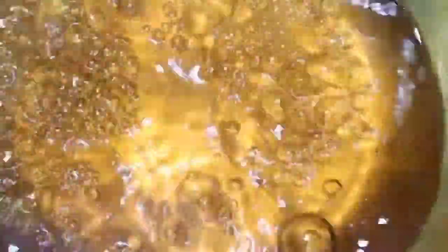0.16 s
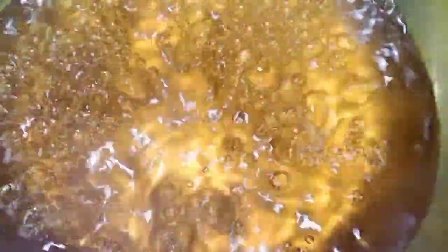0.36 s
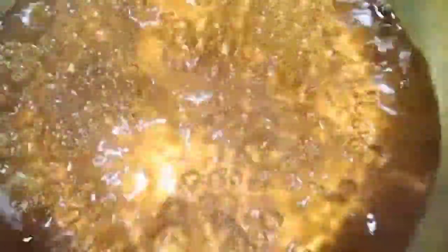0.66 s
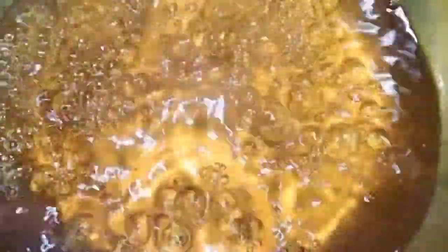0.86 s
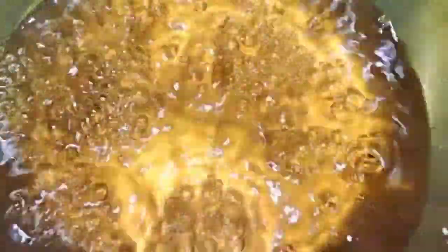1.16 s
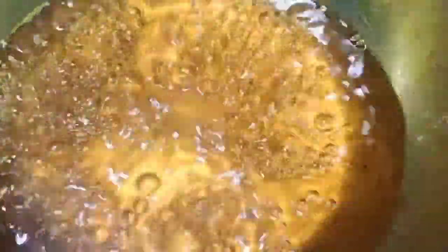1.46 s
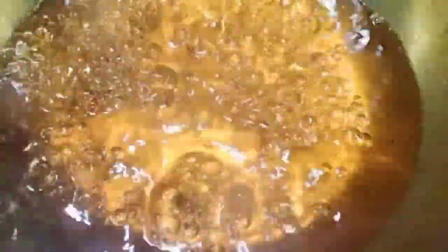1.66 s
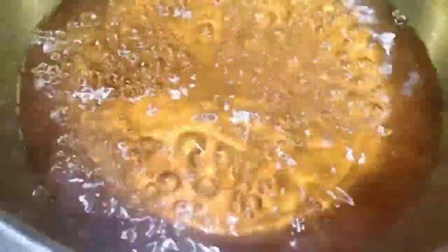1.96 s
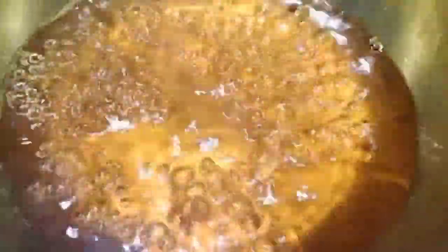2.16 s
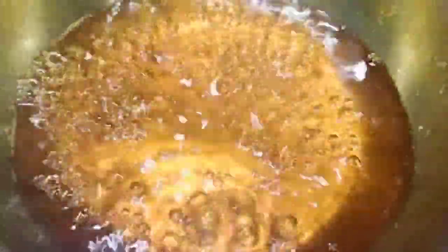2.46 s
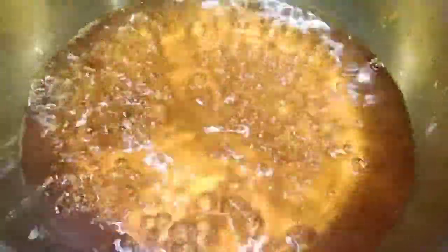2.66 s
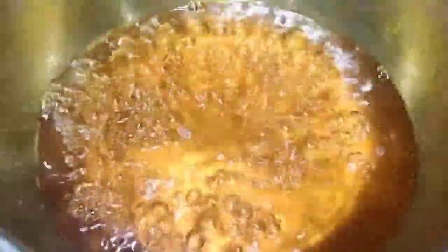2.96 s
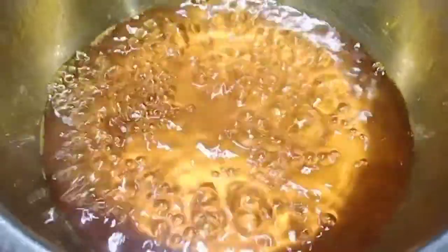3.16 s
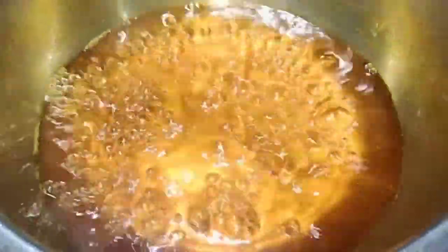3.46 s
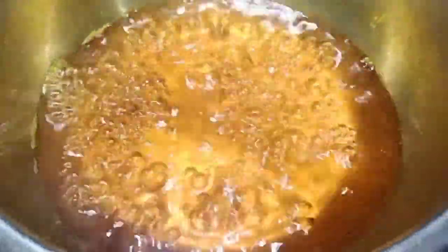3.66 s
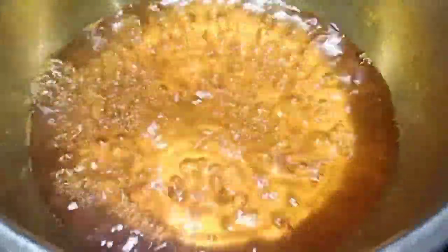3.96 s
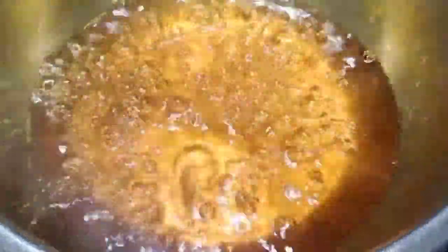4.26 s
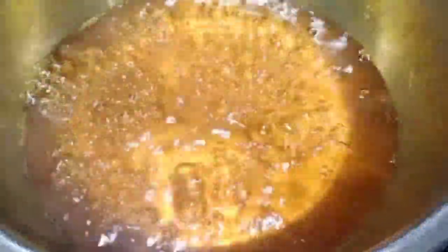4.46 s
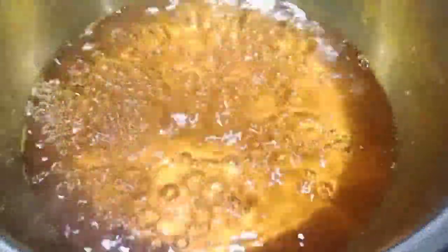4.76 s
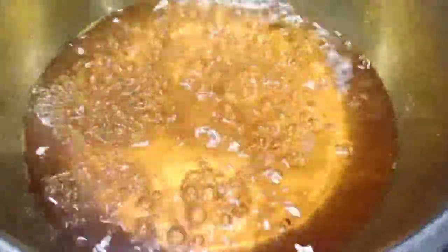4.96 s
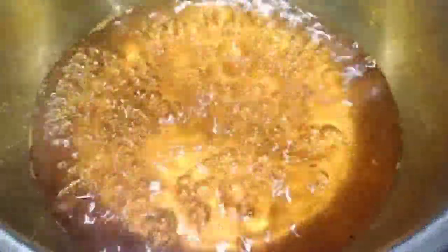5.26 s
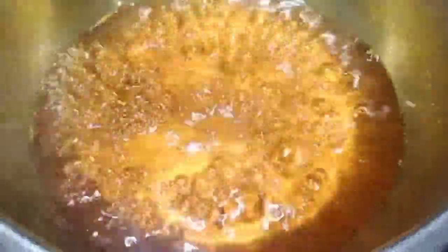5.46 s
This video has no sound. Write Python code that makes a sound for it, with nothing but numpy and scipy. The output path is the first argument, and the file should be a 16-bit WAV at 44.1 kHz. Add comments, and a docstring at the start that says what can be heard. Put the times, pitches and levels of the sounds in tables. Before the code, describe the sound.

From 0 s, thick syrup boils hard in a steel pan, close to a stereo microphone in a small kitchen. A dense fizz of tiny popping bubbles runs throughout, bright and hissy around 7-9 kHz, clearly stronger on the right, with brief irregular swells as foam collapses, notably near 3.5 and 3.85 s. Coarser bubbles tick in the middle range; larger ones burble wetly, hollowed by the pan. A low gurgling resonance colours roughly 0.1-2 s and then fades. Beneath are a soft gas-flame roar and a very faint low hum. Bubbling grows heavier around 4.5 s. At about 4.7-4.75 s a metal spatula strikes the pan: a rapid, bright, ringing clatter, strongest until 4.9 s, becoming a chattering scrape with tiny wavering squeaks to about 5.2 s. A weak scrape remnant and faint sizzle fade by 5.5 s, leaving the boil, slightly livelier, until the end.

```python
"""In a kitchen, sugar syrup boils hard in a steel pan over a gas flame, close to a two-port microphone.
Tiny bubbles are dense random clicks and short pings: a fizz, loudest on the right. Coarser ones tick,
larger ones burble through the pan's air resonances, and narrow bands of noise ring: a low gurgle, then faint
higher sizzle after the scrape. The flame is filtered noise, a hum a sine. Near the end a metal spatula knocks,
scrapes and squeaks on the pan: noise and clicks ring the modes of steel and blade; noise tails are the room."""
import sys
import numpy as np
from scipy import signal
from scipy.fft import rfft, irfft, next_fast_len
from scipy.io import wavfile

SR = 44100
rng = np.random.default_rng(int(sys.argv[2]) if len(sys.argv) > 2 else 0)


def dump(signal):
    """Clip the signal to [-1, 1] and save it as 16-bit WAV at the path in sys.argv[1]."""
    limited = np.clip(np.atleast_2d(signal).T, -1, 1)
    pcm = np.round(limited * 32767).astype(np.int16)
    wavfile.write(sys.argv[1], SR, pcm)


N = 246959
TIME = np.arange(N) / SR
BINS = np.fft.rfftfreq(8192, 1 / SR)

# wall modes of the steel pan: pitch [Hz]
STEEL_MODES_HZ = [1115, 1700, 2841, 3350, 3625, 3990, 4519, 5236, 5763, 5880, 6215, 7100, 7810, 8330, 9118,
                  9520, 9665, 10185, 11000, 12200, 13130, 14100]


def amp(db):
    """Decibels to gain."""
    return 10 ** (np.asarray(db) / 20)


def unit(x):
    """Scales to rms 1."""
    return x / np.sqrt(np.mean(x ** 2) + 1e-20)


def follow(rows):
    """Each column of a curve table, sample by sample."""
    s, *columns = np.transpose(rows)
    return [np.interp(TIME, s, c) for c in columns]


def shape(rows, modes=()):
    """Gain over frequency for each level column: a smooth spectrum plus resonance peaks."""
    hz, *columns = np.transpose(rows)
    levels_db = [np.interp(np.log(BINS + 1), np.log(hz), c) for c in columns]
    power = amp(levels_db) ** 2
    for centre, width, *ears in modes:
        peak = 1 / (1 + ((BINS - centre) / width) ** 2) ** 2
        power = power + amp(ears)[:, None] ** 2 * peak
    return np.sqrt(power)


def ring(x, gain):
    """Passes x through the causal minimum-phase filter of this gain, so that clicks ring and die."""
    log_gain = np.log(np.maximum(gain, 1e-6))
    circle = np.concatenate([log_gain, log_gain[:, -2:0:-1]], axis=1)
    response = np.fft.ifft(np.exp(np.conj(signal.hilbert(circle)))).real
    return signal.oaconvolve(np.atleast_2d(x), response[:, :len(BINS)], axes=1)[:, :N]


def below(x, hz):
    """The part of x under this frequency."""
    return signal.sosfiltfilt(signal.butter(2, hz, fs=SR, output="sos"), x)


def tilted(x, tilt_db, pivot_hz):
    """Raises the treble and lowers the bass by tilt_db, around a pivot."""
    dull = below(x, pivot_hz)
    return dull * amp(-tilt_db) + (x - dull) * amp(tilt_db)


def envelope(start, length, rise_s, release_s, sag_db_per_s=0):
    """A straight rise, a steady sag in dB from the start, and an exponential release after length."""
    age = np.maximum(TIME - start, 0)
    release = np.exp(-np.maximum(age - length, 0) / release_s)
    return np.minimum(age / rise_s, 1) * amp(-sag_db_per_s * age) * release


def wander(low_hz, high_hz):
    """Slow noise of rms 1, with about equal weight in each octave between two rates."""
    size = next_fast_len(N, True)
    hz = np.fft.rfftfreq(size, 1 / SR)
    spectrum = rfft(rng.standard_normal(size))
    spectrum = spectrum / np.sqrt((hz + low_hz) * (1 + (hz / high_hz) ** 4))
    spectrum = spectrum * hz / (hz + low_hz)
    return unit(irfft(spectrum, size)[:N])


def clicks(per_s, spread_db):
    """Random clicks of rms 1 and either sign, their levels in dB spread exponentially."""
    size = amp(spread_db * np.minimum(rng.exponential(1, N), 5))
    sign = rng.choice([-1, 1], N)
    return unit(size * sign * (rng.random(N) < per_s / SR))


def bubbles(low_hz, high_hz, cycles, spread_db, climb, count, size):
    """Bubbles at random times, each a sine decaying over some cycles at its own slightly climbing pitch."""
    when, pitch, strength = rng.random((count, 3)).T[:, :, None]
    turns = low_hz * (high_hz / low_hz) ** pitch * np.arange(size) / SR
    age = turns / cycles
    height = amp(spread_db * np.minimum(-np.log(1 - strength), 4))
    rings = height * np.exp(-age) * np.sin(2 * np.pi * turns * (1 + climb * age))
    at = (when * N).astype(int) + np.arange(size)
    return unit(np.bincount(at.ravel(), rings.ravel(), N)[:N])


def at_ports(x):
    """Sound from the pan reaches the left port a little before the right."""
    lag_s = .00012
    return np.array([x, np.interp(TIME - lag_s, TIME, x)])


def near_echoes(x):
    """Early reflections off the pan's own wall ripple the spectrum."""
    # (delay [s], gain)
    reflections = [(.0031, .17), (.0053, -.2), (.0082, .18), (.0127, .15)]
    return x + sum(gain * np.pad(x, (round(s * SR), 0))[:N] for s, gain in reflections)


def kitchen(x):
    """Diffuse reflections: noise tails, different at each port, with a decay time set by frequency."""
    # (frequency [Hz], time to fall 60 dB [s])
    decay = [(300, 0.14), (1600, 0.2), (4000, 0.52), (9000, 0.29), (14000, 0.39)]
    hz, t, z = signal.stft(rng.standard_normal((2, SR // 2)), SR, nperseg=256)
    t60 = np.interp(hz, *np.transpose(decay))[:, None]
    build_up = 1 - np.exp(-t / .006)
    tail = signal.istft(z * amp(-60 * t / t60) * build_up, SR, nperseg=256)[1]
    return signal.oaconvolve(x * np.ones((2, 1)), tail / np.linalg.norm(tail[0]), axes=1)[:, :N]


def scattered(x, count=4, spots_per_s=45):
    """Bubbles rise now here, now there: x moves between spots, each with its own reflections."""
    spot = spots_per_s * TIME + wander(3.9, 12.3)
    total = 0
    for k in range(count):
        share = np.maximum(1 - abs((spot - k) % count - 1), 0)
        total = total + kitchen(x * np.sqrt(share))
    return total


def hum(pitch_hz=120):
    """An appliance's faint mains hum: a sine of changing level."""
    # (time [s], level [dB])
    course = [(0, -68.5), (.7, -61.5), (1.3, -86), (5.6, -71)]
    return amp(follow(course)[0]) * unit(np.sin(2 * np.pi * pitch_hz * TIME))


def flame():
    """The soft, low roar of the burner: filtered noise, mostly shared by both ports."""
    # (frequency [Hz], level [dB])
    colour = [(20, -56), (48, -47), (68, -53), (100, -43), (128, -39.5), (160, -38), (220, -42),
              (400, -43.5), (1200, -62.5)]
    roar = .93 * rng.standard_normal(N) + .52 * rng.standard_normal((2, N))
    return ring(roar, shape(colour))


def gaps():
    """Gain of the antiresonances, narrow bands in which the steel sounds less."""
    # (frequency [Hz], width [Hz], level [dB])
    dips = [(3810, 90, -7), (4965, 95, -23), (5530, 70, -5), (9340, 110, -7)]
    return amp(sum(db * np.exp(-((BINS - hz) / width) ** 2) for hz, width, db in dips))


def clack(direct_db=-2, room_db=0, pivot_hz=3500):
    """The blade's clatter: dense contacts that dull as they settle ring its modes and the kitchen."""
    # (time [s], length [s], level [dB], treble tilt [dB])
    clatters = [(4.706, 0.048, -19, -8), (4.819, 0.03, 2.5, 1), (4.853, 0.03, -8, -3),
                (4.883, 0.256, -7.5, -2)]
    # (frequency [Hz], left level [dB], right level [dB])
    colour = [(80, -89, -85), (600, -57, -64), (1010, -23, -53), (1350, -24.5, -45), (2200, -23.5, -48),
              (3330, -19.5, -30), (4930, -24.5, -39), (7500, -23, -36), (9200, -26, -12),
              (11000, -15.5, -38), (13300, -22, -20), (15600, -32, -35)]
    # blade modes: (frequency [Hz], width [Hz], left level [dB], right level [dB])
    blade = [(869, 23, -12.5, -43), (1118, 29, -14, -24), (1533, 68, -16, -20), (1710, 90, -13.5, -27),
             (8200, 73, -5, 0), (9650, 81, -9, 0.5)]
    rise_s, release_s, sag_db_per_s, dulling_db_per_s = 0.011, 0.016, 70, 28
    contacts = clicks(per_s=9000, spread_db=1.5)
    hits = np.zeros(N)
    for start, length, level_db, tilt_db in clatters:
        force = amp(level_db) * envelope(start, length, rise_s, release_s, sag_db_per_s)
        dulling_db = dulling_db_per_s * np.clip(TIME - start, 0, length)
        hits = hits + force * tilted(contacts, tilt_db - dulling_db, pivot_hz)
    heard = amp(direct_db) * hits + amp(room_db) * kitchen(hits)
    return ring(heard, shape(colour, blade) * gaps())


def blows(contact_s=0.0065):
    """Each knock is a brief chatter of contact: noise that decays within milliseconds."""
    # (time [s], relative level [dB])
    knocks = [(4.756, -4), (4.774, -11), (4.801, -11), (4.84, -20), (4.866, -19), (4.895, -13),
              (4.935, -12), (4.974, -6), (5.012, -11), (5.028, -8), (5.083, -15), (5.125, -9)]
    force = sum(amp(db) * (TIME >= s) * np.exp(-abs(TIME - s) / contact_s) for s, db in knocks)
    return force * rng.standard_normal(N)


def scrape(judder_db=2.0, pivot_hz=6000, knock_db=9, knock_left_db=-7, scrape_db=-2.2):
    """Knocks and the catch-and-slip of the edge ring the wall, whose mode levels shift as the blade slides."""
    # (time [s], length [s], relative pressure [dB], treble tilt [dB], extra left level [dB])
    pushes = [(4.754, 0.029, 8, 2, 0), (4.785, 0.046, 1.5, 3, -8), (4.838, 0.063, -3, 5, -3),
              (4.92, 0.044, 2, 1.5, -7), (4.97, 0.21, 2, -0.5, -15), (5.207, 0.13, -11, 2, -13)]
    # wall modes in order of pitch: (width [Hz], left level [dB], right level [dB], extra on landing [dB])
    steel = [(20, -31, -30, -2), (148, -44, -21.5, -9), (13, -13, -7.5, 1), (13, -4.5, -7.5, 9.5),
             (20, -16, -15, 5), (16, -18, -15.5, 0), (16, -4, -8.5, 5), (16, -10, -5, -5),
             (14, -19, -4, -1.5), (45, -26, -17, -9), (24, -30, -9, 0), (90, -30, -2, -1),
             (45, -29, -16, 0), (125, -27, -2.5, -4), (22, -5, -1.5, -8), (20, -16, -7, 3.5),
             (50, -19, -11.5, 0), (22, -22, -9, 2), (70, -26, -15, -3), (22, -22, -11.5, 9),
             (50, -23, -18, 6), (80, -26, -23, 3)]
    # dense, weaker wall modes: (frequency [Hz], left level [dB], right level [dB])
    dense_wall = [(80, -66, -87), (1010, -26, -66), (1830, -33, -39), (2280, -23.5, -25.5),
                  (2700, -22, -28), (3320, -24, -22.5), (4100, -26, -22), (5300, -19, -20.5),
                  (6070, -22, -18), (7440, -31, -14), (9500, -37, -27), (11300, -49, -26),
                  (13300, -32, -35), (15200, -34, -41)]
    rise_s, release_s, sag_db_per_s, dulling_db_per_s = 0.021, 0.014, 49.5, 3
    slide_start_s, slide_length_s = 4.8, 0.07  # the blade leaves the spot where it landed

    slips = clicks(per_s=7000, spread_db=0.5) * amp(scrape_db + judder_db * wander(25, 110))
    drive = amp(knock_db) * blows() * amp([[knock_left_db], [0]])
    for start, length, pressure_db, tilt_db, left_db in pushes:
        pressure = amp(pressure_db) * envelope(start, length, rise_s, release_s, sag_db_per_s)
        dulling_db = dulling_db_per_s * np.clip(TIME - start, 0, length)
        push = pressure * tilted(slips, tilt_db - dulling_db, pivot_hz)
        drive = drive + push * amp([[left_db], [0]])

    landing, sliding = [], []
    for hz, (width, left, right, extra) in zip(STEEL_MODES_HZ, steel):
        landing.append((hz, width, left + extra, right + extra))
        sliding.append((hz, width, left, right))
    slid = np.clip((TIME - slide_start_s) / slide_length_s, 0, 1)
    wall = ring(drive * (1 - slid), shape(dense_wall, landing) * gaps())
    wall = wall + ring(drive * slid, shape(dense_wall, sliding) * gaps())
    return wall * amp([[-3], [-.5]]) + kitchen(wall) * amp([[-6], [-11]])


def squeak(waver_hz=9, left_db=-15, rise_s=0.03, release_s=0.012):
    """Slips lock to the nearest wall mode: a wavering sine that swells and dies."""
    # (time [s], length [s], pitch [Hz], level [dB])
    squeaks = [(4.959, 0.066, 2841, -30), (4.968, 0.046, 5236, -36), (5.058, 0.06, 5236, -39),
               (5.125, 0.049, 5236, -34), (5.205, 0.04, 5236, -51), (5.205, 0.049, 2841, -54)]
    drift_cycles = np.cumsum(waver_hz * wander(26, 90)) / SR
    tones = np.zeros(N)
    for start, length, hz, level_db in squeaks:
        mode_hz = min(STEEL_MODES_HZ, key=lambda mode: abs(mode - hz))
        level = amp(level_db) * envelope(start, length, rise_s, release_s)
        tones = tones + level * np.sin(2 * np.pi * (mode_hz * TIME + drift_cycles))
    return tones * amp([[left_db], [0]])


def ringing_band(start, length, hz, level_db, left_db, width_share=0.13, drift_hz=35, climb_hz_per_s=86):
    """A narrow band of noisy ringing: random clicks band-passed around a drifting, climbing pitch."""
    level = amp(level_db) * envelope(start, length, rise_s=0.069, release_s=0.6, sag_db_per_s=3)
    pitch_hz = hz + climb_hz_per_s * (TIME - start) + drift_hz * wander(1.5, 7.8)
    turn = np.exp(2j * np.pi * np.cumsum(pitch_hz) / SR)
    # a low-pass in the frame turning at the pitch is a band-pass that follows it
    lowpass = signal.butter(2, width_share * hz, fs=SR, output="sos")
    ringing = signal.sosfilt(lowpass, clicks(per_s=200, spread_db=-1.5) / turn)
    return at_ports(unit((turn * ringing).real) * level) * amp([[left_db], [0]])


def burble(wet=1.0, split_hz=560, burble_db=-1.87, lump_db=0.5, blip_db=-17, diffuse_hz=1150):
    """Larger bubbles pop and blip and sound the air in the pan; the smaller are heard more by the room."""
    # (time [s], big bubbles [dB], middling bubbles [dB])
    churn = [(0, -5, 1), (.2, 0, 0), (.8, -1.8, -1), (1.5, -0.7, -0.5), (3.3, -1.5, 0), (4.3, -1.5, -0.5),
             (4.52, 2.5, -2), (4.85, -8.5, -0.5), (5.1, -3.5, 1), (5.6, 0.5, -0.5)]
    # (frequency [Hz], relative level [dB])
    colour = [(100, -68), (210, -82), (260, -50), (480, -35.5), (900, -40.5), (1120, -39.5), (1350, -38),
              (1700, -43.5), (2100, -95), (3200, -54)]
    # air resonances of the pan: (frequency [Hz], width [Hz], relative left level [dB], right [dB])
    hollow = [(265, 25, -31, -32), (358, 48, -29.5, -31.5), (640, 70, -32, -37), (825, 55, -32, -33),
              (1030, 45, -38, -38), (1517, 34, -30.5, -31.5)]
    big_db, middling_db = follow(churn)
    blips = bubbles(331.7, 1001, cycles=7.2, spread_db=1.74, climb=0.013, count=420, size=2000)
    pops = clicks(per_s=1100, spread_db=1.5) + amp(blip_db) * blips
    pops = pops * amp(lump_db * wander(22.0, 17.0))
    big = below(pops, split_hz)
    middling = (pops - big) * amp(middling_db)
    small = middling - below(middling, diffuse_hz)
    direct = at_ports(big * amp(big_db) + middling - .5 * small)
    room = scattered(middling + .5 * big + .5 * small)
    return amp(burble_db) * ring(direct + wet * room, shape(colour, hollow))


def vigour():
    """Level of the fizz in dB: the slow course of the boil, and a brief swell as each foam clump collapses."""
    # (time [s], relative level [dB])
    boil = [(0, 1.1), (.6, 0.5), (1.95, -0.05), (2.6, 0.7), (3.3, 0.14), (4.4, 1), (5.6, 2)]
    # collapses of foam: (time [s], swell [dB])
    surges = [(.172, 2), (.388, 2), (.532, 3), (.652, 3), (.778, 4), (1.059, 1), (1.12, 3), (1.434, 1.5),
              (1.527, 1), (1.672, 1.5), (2.154, 1), (2.256, 0.5), (2.536, 1.8), (2.644, 2.5), (2.943, 2.5),
              (3.061, 3.5), (3.185, 1), (3.272, 2), (3.547, 5.5), (3.846, 4), (4.073, 0.8), (4.267, 2.5),
              (4.386, 2.4), (4.606, 4)]
    half_length_s = 0.017
    return follow(boil)[0] + sum(db * np.exp(-((TIME - s) / half_length_s) ** 2) for s, db in surges)


def crackle(level_db, crackle_db=-52, wander_db=3, left_db=-9, wet=0.21):
    """Coarser bubbles tick in the middle of the spectrum, their level wandering at random."""
    ticks = bubbles(2573, 6230, cycles=9.8, spread_db=2.5, climb=0.004, count=2500, size=450)
    ticks = unit(ticks * amp(level_db + wander_db * wander(5, 25)))
    return amp(crackle_db) * (at_ports(ticks) + wet * kitchen(ticks)) * amp([[left_db], [0]])


def fizz(level_db, flutter_db=0.89, ping_db=-8, wet=0.58, left_db=0.0, right_db=-1.11):
    """Tiny bubbles click and ping: direct at the right port; separate clicks and some reflection at the left."""
    # (frequency [Hz], relative left level [dB], relative right level [dB])
    colour = [(700, -62, -60), (1950, -48, -45), (2400, -46, -38), (2800, -46, -35.5), (3500, -43.5, -34.7),
              (4500, -42.5, -36), (5700, -51, -35.5), (6500, -43, -25.5), (7200, -42, -17),
              (7950, -41, -14.3), (9000, -42, -20), (10300, -42, -26.5), (12000, -45, -36.5),
              (14000, -51, -39.5), (15300, -62, -44)]
    swell = amp(level_db - np.median(level_db) + flutter_db * wander(1.4, 45))
    pings = bubbles(6600, 14930, cycles=31, spread_db=0.0, climb=0.0011, count=3200, size=600)
    bursts = swell * (clicks(per_s=14000, spread_db=2.0) + amp(ping_db) * pings)
    far_side = swell * clicks(per_s=9700, spread_db=3.0)
    room = scattered(bursts, count=3)
    left = unit(far_side + 0.16 * room[0])
    right = unit(near_echoes(bursts) + wet * room[1])
    return ring(np.array([left, right]), shape(colour)) * amp([[left_db], [right_db]])


def scene():
    """The boiling pan on its flame, the hum, and the spatula."""
    # a low gurgle, then faint higher sizzle after the scrape:
    # (time [s], length [s], pitch [Hz], level [dB], extra left level [dB])
    bands = [(0.1, 1.9, 729, -51.5, 0.5), (5.207, 0.22, 1090, -49.5, -5), (5.23, 0.16, 2200, -51.5, -11),
             (5.4, 0.15, 1440, -59, -10)]
    boil_db = vigour()
    syrup = fizz(boil_db) + crackle(boil_db) + burble() + sum(ringing_band(*row) for row in bands)
    spatula = scrape() + squeak() + clack()
    return syrup + flame() + hum() + spatula


def record(dry, low_cut_hz=46, edge_hz=15450):
    """The microphone's low cut and the recorder's band limit."""
    thin = signal.sosfilt(signal.butter(2, low_cut_hz, "highpass", fs=SR, output="sos"), dry)
    band_limit = signal.firwin(511, edge_hz, window=("kaiser", 9), fs=SR)
    return signal.oaconvolve(thin, band_limit[None], "same", axes=1)


dry = scene()
out = record(dry)
dump(out)
```